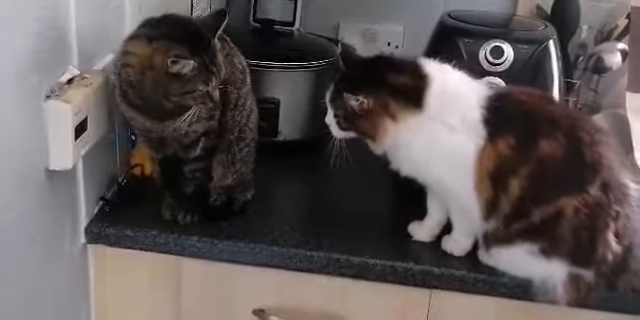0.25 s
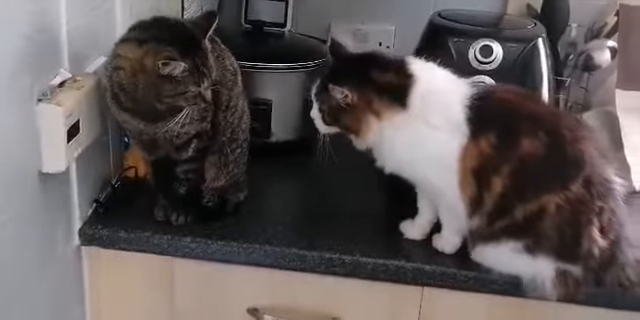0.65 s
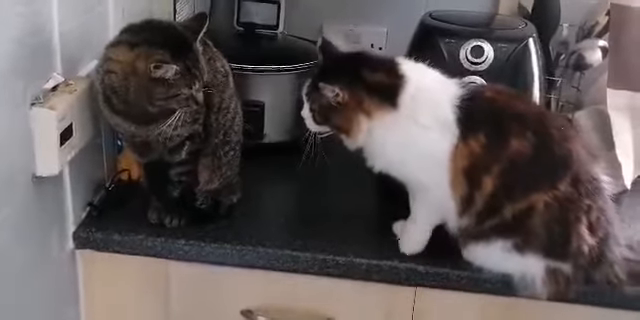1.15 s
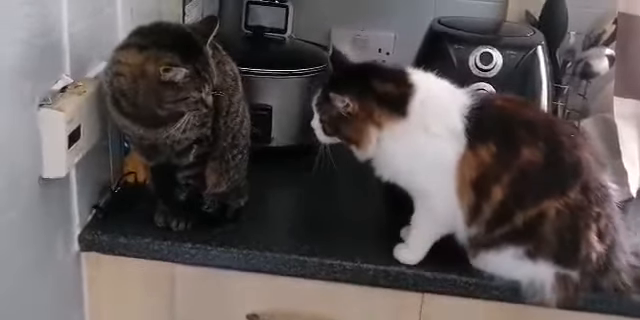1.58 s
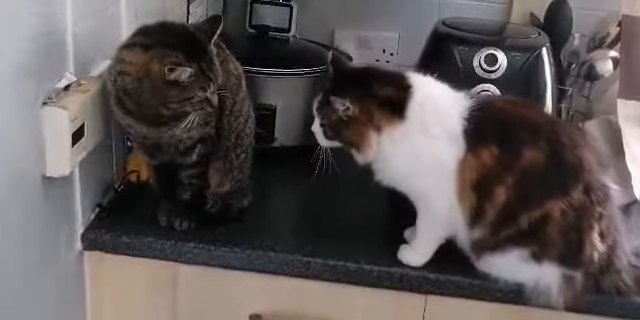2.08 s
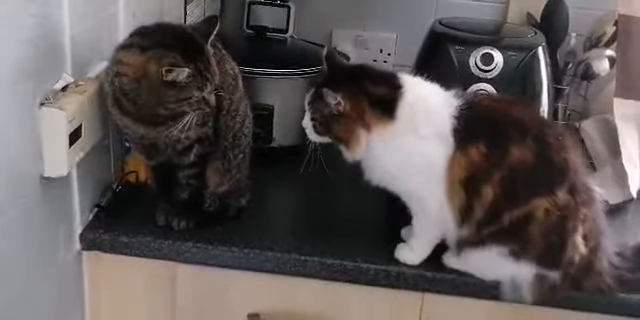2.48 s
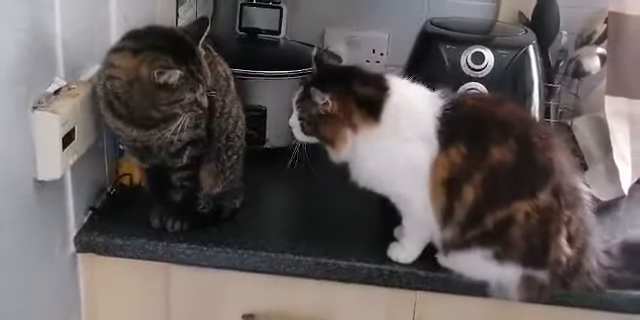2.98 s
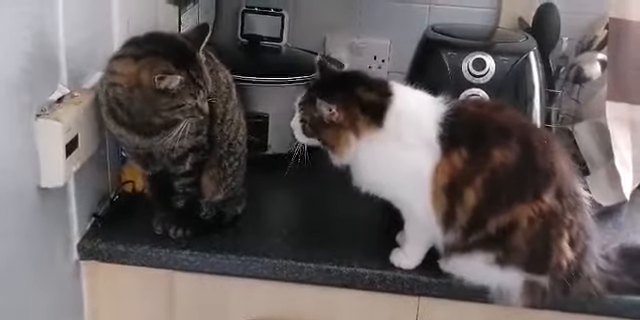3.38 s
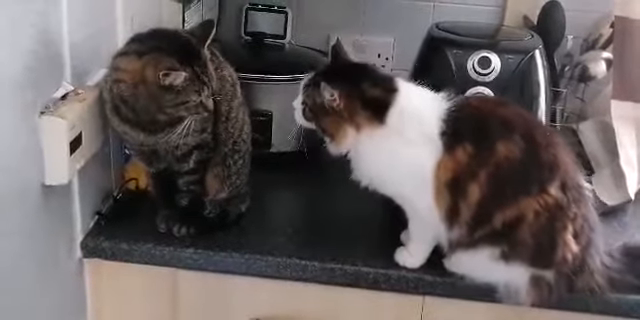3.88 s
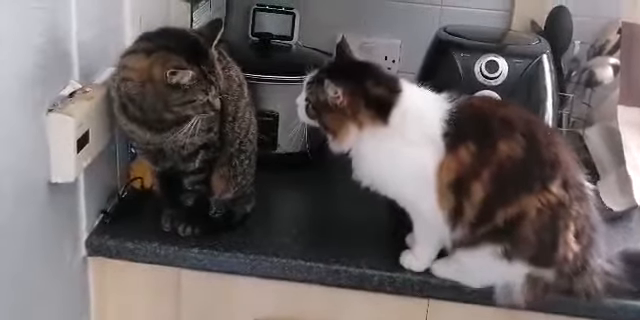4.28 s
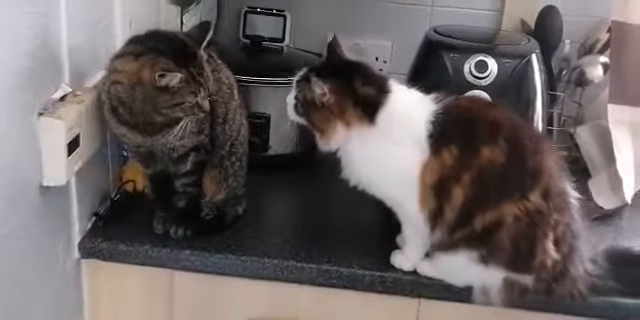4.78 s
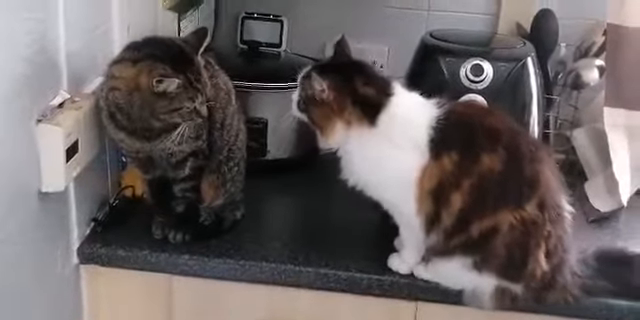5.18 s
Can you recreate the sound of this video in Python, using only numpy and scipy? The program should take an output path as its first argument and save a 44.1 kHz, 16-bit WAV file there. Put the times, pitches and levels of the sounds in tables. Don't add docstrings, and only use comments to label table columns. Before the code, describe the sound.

In a small hard-walled kitchen, a cat yowls long and clear, rising quickly then slowly falling. Nearly two seconds of quiet follow, with faint room hiss, fridge hum and a whirring clock step each second. A second, hoarser howl bursts out, dips, breaks high and sinks into a softer moan. Soft paw taps end it. Phone microphone a few steps away.

```python
import sys
import numpy as np
from scipy import signal
from scipy.fft import rfft, irfft
from scipy.io import wavfile

SR = 44100
rng = np.random.default_rng(int(sys.argv[2]) if len(sys.argv) > 2 else 0)


def int16_out(signal):
    q = np.round(np.clip(np.atleast_2d(signal).T, -1, 1) * 32767)
    wavfile.write(sys.argv[1], SR, q.astype(np.int16))


def magnitude_from_level(level_db):
    exponent = np.asarray(level_db, float) / 20
    return 10 ** exponent


N = 240118


def evened(x):
    return x / np.sqrt(np.mean(x ** 2) + 1e-20)


def read(points, hz):
    point_hz, value = np.transpose(points)
    return np.interp(np.log(hz + 1), np.log(point_hz + 1), value)


def add(mix, start_s, sound):
    part = mix[round(start_s * SR):][:len(sound)]
    part += sound[:len(part)]


def noise(spectrum):
    gain = magnitude_from_level(read(spectrum, np.fft.rfftfreq(N, 1 / SR)))
    return evened(irfft(rfft(rng.standard_normal(N)) * gain, N))


def drift(count, rate_hz):
    low = signal.butter(2, rate_hz, fs=SR, output="sos")
    settled = signal.sosfilt(low, rng.standard_normal(count + SR))[SR:]
    return evened(settled)


def resonance_db(hz, center_hz, width_hz, peak_db):
    return peak_db / (1 + (2 * (hz - center_hz) / width_hz) ** 2)


# time_s, effort_db, mouth_hz
EFFORT = [
    [(0, -49, 943), (.22, -93, 970)],
    [(0, -37, 976), (.02, -54, 787), (.045, -49.5, 693), (.075, -55, 605), (.097, -58.5, 566)],
    [(.097, -41.5, 862), (.15, -40.5, 740), (.24, -37.5, 623), (.47, -43, 560), (.9, -38, 430),
     (1.08, -43, 436), (1.22, -48.5, 535), (1.38, -49, 694), (1.43, -69.5, 710)],
    [(3.2, -82.5, 1600), (3.212, -55, 1640), (3.25, -50, 1500), (3.266, -46, 1620)],
    [(3.266, -43, 1667), (3.31, -39, 1480), (3.34, -43.5, 1390), (3.39, -41.5, 1050), (3.43, -44, 1000),
     (3.46, -43, 710)],
    [(3.46, -49.5, 720), (3.5, -44, 695), (3.6, -42, 810), (3.685, -37.5, 590), (3.699, -41, 590)],
    [(3.699, -66, 790), (3.73, -50, 650), (3.95, -52.5, 560), (4.15, -52.5, 538), (4.3, -50, 540),
     (4.5, -57.5, 600), (4.69, -51, 440), (4.78, -57, 430), (4.87, -79.5, 475)],
]
# time_s, pitch_hz
PITCH = [
    [(0, 502.0), (0.22, 500.0)],
    [(0, 518.0), (0.04, 530.0), (0.07, 543.0), (0.097, 563.0)],
    [(0.097, 568), (0.135, 607), (0.22, 640), (0.34, 654), (0.53, 635.5), (0.98, 614), (1.21, 571),
     (1.37, 512), (1.43, 493)],
    [(3.2, 577.3), (3.22, 570.1), (3.25, 584.2), (3.272, 583.5)],
    [(3.272, 485.6), (3.288, 472.0), (3.312, 490), (3.342, 501), (3.382, 508), (3.415, 513), (3.46, 536)],
    [(3.46, 548.0), (3.475, 590.0), (3.5, 619.9), (3.54, 636.6), (3.58, 649.0), (3.62, 658.9),
     (3.66, 647.8), (3.705, 595.7)],
    [(3.705, 527.9), (3.785, 514.9), (3.875, 515), (3.965, 519), (4.125, 515.2), (4.305, 507.5),
     (4.68, 484), (4.785, 443), (4.9, 432)],
]
# first_db, second_db, third_db, upper_db, extra edge after the jump edge_db
FOLDS = [(-16, -14, -27, -12.5, 0.1), (-12.5, -17.5, -16.5, -5.5, -10.5), (-16.5, -28.5, -51, -45, 31.5),
         (-14.5, -9.5, -19.5, -16.5, 5.5), (-22, -16.5, -18.5, -14, -3), (-19.5, -23, -22.5, -26.5, 9),
         (-18, -11, -15, -17.5, 5)]
THROAT = [
    [6, -12, -23.5, -17, -33, -49, -54, -51, -59, -45],
    [7, -13.5, -25, -26.5, -43, -62, -57, -44.5, -36, -42],
    [-7, -7, -11, -13.5, -18.5, -15.5, -16, -8.5, -29.5, -18.5],
    [2.5, -1, -6, -5.5, -18.5, -39, -20, -37.5, -30, -28],
    [1, -7, -36, -14, -23, -30, -45.5, -37, -42.5, -49.5],
    [-9, -4, -19.5, -23, -20.5, -23.5, -33.5, -51, -39, -50.5],
    [2.5, -5, -23, -21.5, -24.5, -24, -45.5, -28.5, -32, -36.5],
]
HOARSE = [(.07, .05), (.07, .05), (.08, .045), (.07, .16), (.38, .17), (.24, .12), (.2, .055)]
# time_s, jump_hz, settling_s
THROAT_CATCH = (3.878, 16, .045)
# center_hz, width_hz, peak_db
CAVITY = [(1603, 110, 10.5), (2596, 82, 7), (3660, 170, 9.5), (5050, 30, 12), (5860, 300, 8.5)]
# time_s, half_width_s, share_left (0-1)
NULLS = [
    [(.208, 0.0093, 0.3), (.3, 0.14, 0), (.39, 0.16, 0.13), (.442, 0.0078, .05), (.553, 0.0069, 0.4),
     (.632, 0.031, .15), (.743, 0.022, 0), (.81, 0.0098, 0.4), (1.293, 0.011, 0.4), (1.04, 0.017, 0.5),
     (1.13, 0.024, 0.3), (1.25, 0.022, 0), (1.325, 0.0061, .2), (1.38, 0.0032, .25), (3.635, 0.014, 0.1),
     (3.672, 0.01, 0.1), (4.4, 0.011, 0), (4.47, 0.1, .4), (4.77, 0.021, .05)],
    [(.47, 0.02, 0), (.93, 0.054, 0), (1.21, 0.01, 0.5), (3.23, 0.008, 0.3), (3.445, 0.03, 1),
     (3.98, 0.09, 0.7), (4.08, 0.026, 0), (4.62, 0.12, 0.7)],
    [(3.425, .012, 0.5), (3.77, 0.17, .3), (4.38, .2, .35)],
]
BLEND_S = 0.012


def yowl(rows, pitch, folds_db, throat_db, hoarse):
    time_s, *columns = np.transpose(rows)
    t = np.arange(time_s[0], time_s[-1] + BLEND_S, 1 / SR)
    since_jump = t - t[0]
    effort_db, mouth_hz = (np.interp(t, time_s, column) for column in columns)

    catch_s, catch_hz, catch_settle_s = THROAT_CATCH
    since = t - catch_s
    hz = np.interp(t, *np.transpose(pitch))
    hz += catch_hz * (since > 0) * np.exp(-abs(since) / catch_settle_s)

    at_jump, settled = hoarse
    rasp = settled + (at_jump - settled) * np.exp(-since_jump / 0.08)
    tremor = 0.006 * drift(len(t), 18)
    jitter = (0.002 + 0.03 * rasp) * drift(len(t), 80)
    turns = np.cumsum(hz * (1 + tremor + jitter)) / SR

    first_db, second_db, third_db, upper_db, edge_db = folds_db
    bright_db = 7 * np.log2(mouth_hz / 1000)
    edge_db = edge_db * np.exp(-since_jump / 0.089)
    tones_db = [first_db, second_db, third_db]
    tones_db += [upper_db + bright_db + db for db in throat_db]

    out = np.zeros(len(t))
    for k, tone_db in enumerate(tones_db, 1):
        shimmer = 1 + 0.27 * min(k, 12) * rasp * drift(len(t), 200)
        fading_db = (0.8 + 0.36 * k) * drift(len(t), 22)
        ring_db = sum(resonance_db(k * hz, *cavity) for cavity in CAVITY)
        ring_db += resonance_db(k * hz, mouth_hz, 634, 19.5)
        partial_edge_db = (k > 2) * edge_db * (3 / k) ** 1.5
        level = magnitude_from_level(effort_db + tone_db + fading_db + ring_db + partial_edge_db) + 0j
        for null_s, half_width_s, left in NULLS[k - 1] if k <= len(NULLS) else []:
            u = (t - null_s) / half_width_s
            level = level * (u + 1j * np.clip(left, 0, 1)) / (u + 1j)
        cycle = np.exp(2j * np.pi * (k * turns + rng.random()))
        out += np.sqrt(2) * shimmer * (level * cycle).real

    fade_in_s = since_jump + (time_s[0] == 0)
    nearest_end_s = np.minimum(fade_in_s, t[-1] - t)
    fade = np.sin(np.pi / 2 * np.clip(nearest_end_s / BLEND_S, 0, 1))
    return time_s[0], out * fade


# band_hz, t60_s
ROOM = [(400, .24), (700, .33), (1000, .36), (3000, .36), (7000, .25)]
# band_hz, level_db
WET = [(450, -18), (650, -12), (1000, -7), (1500, -4.5), (4000, -3.5)]


def kitchen(x):
    taps = np.zeros(SR)
    at = np.arange(260, SR - 20, 20)
    taps[at + rng.integers(0, 20, len(at))] = rng.choice([-1., 1.], len(at))
    hz, t, z = signal.stft(taps, SR, nperseg=256)
    z = z * magnitude_from_level(-60 * t / read(ROOM, hz)[:, None])
    energy = np.linalg.norm(signal.istft(z, SR, nperseg=256)[1])
    wet = magnitude_from_level(read(WET, hz))[:, None]
    tail = signal.istft(z * wet, SR, nperseg=256)[1]
    return signal.fftconvolve(x, tail / energy)[:N]


# peak_s, level_db, fall_db_per_s
RUSTLE = [
    (1.55, -84.5, 40),
    (4.51, -70.5, 86.5),
]
# band_hz, density_db (per Hz)
FUR = [(1590, -21.5), (2700, 5), (3550, -2), (4370, -12.5), (4740, -0.5), (6330, -22.5), (7360, -52.5),
       (9570, -49), (16200, -120)]
# start_s, peak_db, pitch_hz, t60_s
TAPS = [
    (3.085, -69.5, 2800, .02),
    (5.123, -65, 447, 0.032),
    (5.198, -61, 406, 0.04),
    (5.31, -65.5, 270, 0.14),
]


def paws():
    now, t = np.arange(N) / SR, np.arange(SR // 10) / SR
    swell = np.zeros(N)
    for peak_s, level_db, fall_db_per_s in RUSTLE:
        below_db = np.maximum(97.5 * (peak_s - now), fall_db_per_s * (now - peak_s))
        swell += magnitude_from_level(level_db - below_db)
    out = noise(FUR) * swell
    for start_s, peak_db, pitch_hz, t60_s in TAPS:
        add(out, start_s, magnitude_from_level(peak_db - 60 * t / t60_s) * np.sin(2 * np.pi * pitch_hz * t))
    return out


# start_s, level_db
TICKS = [
    (.305, -76.5),
    (1.305, -75.5),
    (2.303, -74),
    (3.305, -81),
    (4.299, -71.5),
    (5.293, -69.5),
]
# center_hz, width_hz, level_db
GEARS = [(530, 20, -6), (750, 77, 4.5), (1640, 27, 1.5), (2800, 1000, 10), (3940, 170, -9),
         (5460, 170, -30)]


def clock():
    hiss = rng.standard_normal(N)
    case = np.zeros(N)
    for center_hz, width_hz, level_db in GEARS:
        b, a = signal.iirpeak(center_hz, center_hz / width_hz, SR)
        case += magnitude_from_level(level_db) * evened(signal.lfilter(b, a, hiss))
    t, gate = np.arange(SR // 4) / SR, np.zeros(N)
    rise = np.clip((t - 0.003) / 0.03, 0, 1) ** 0.7
    burst = rise * magnitude_from_level(-150 * np.maximum(t - 0.085, 0))
    for start_s, level_db in TICKS:
        add(gate, start_s, magnitude_from_level(level_db) * burst)
    return gate * (1 + 0.15 * drift(N, 150)) * evened(case)


# pitch_hz, level_db, waver_hz
HUM = [(49.8, -66, 0.1), (130, -108.5, 0.66), (914, -87, 11)]


def fridge():
    t = np.arange(N) / SR
    out = np.zeros(N)
    for pitch_hz, level_db, waver_hz in HUM:
        wobble = np.cumsum(waver_hz * drift(N, 4.8)) / SR
        level = np.sqrt(2) * magnitude_from_level(level_db + 0.9 * drift(N, 5))
        out += level * np.cos(2 * np.pi * (pitch_hz * t + wobble))
    slip_hz = 1.2
    return out * (1 + 0.033 * np.cos(2 * np.pi * slip_hz * t))


# band_hz, density_db (per Hz)
AIR = [(3, -3.5), (14, -11.5), (30, -16), (60, -20), (140, -24.5), (300, -26.5), (550, -26.5), (700, -30.5),
       (1300, -33.5), (3000, -39.5), (5000, -45.5), (7400, -52), (7700, -59), (20000, -96)]


def air():
    return magnitude_from_level(-69.5 + 0.6 * drift(N, 8)) * noise(AIR)


def phone_gain():
    t = np.arange(N) / SR
    sag_from_s, sag_db_per_s, wake_s, wake_rise_s = 1.82, 3, 3.2, 0.06
    asleep = np.clip(1 - (t - wake_s) / wake_rise_s, 0, 1)
    sag_db = sag_db_per_s * np.maximum(t - sag_from_s, 0) * asleep
    return magnitude_from_level(1.5 - sag_db)


def scene():
    cat = np.zeros(N)
    for register in zip(EFFORT, PITCH, FOLDS, THROAT, HOARSE):
        add(cat, *yowl(*register))
    background = (air() + fridge()) * phone_gain()
    mix = cat + kitchen(cat) + clock() + paws() + background
    return mix[None]


def top_cut(x):
    return signal.sosfilt(signal.butter(12, 7510, fs=SR, output="sos"), x)


def record(dry):
    edge = signal.firwin(511, 7520, window=("kaiser", 9), fs=SR)
    dry = dry * np.clip(np.arange(N) / SR / 0.008, 0, 1)
    floor = magnitude_from_level(-95.0) * rng.standard_normal(dry.shape)
    mix = signal.oaconvolve(dry, edge[None], "same") + floor
    return top_cut(mix)


dry = scene()
out = record(dry)
int16_out(out)
```